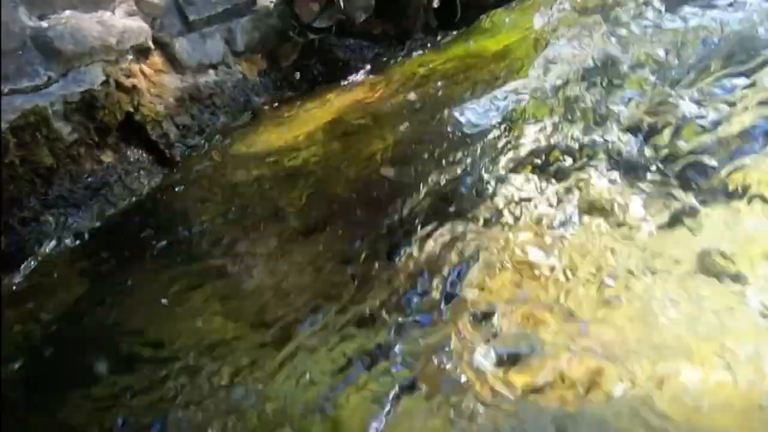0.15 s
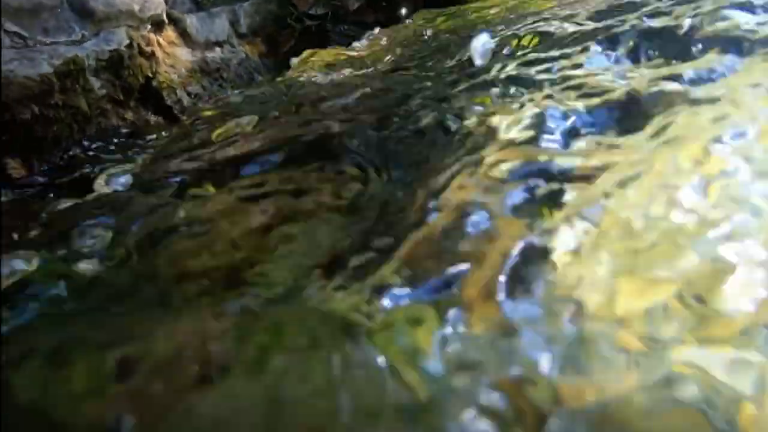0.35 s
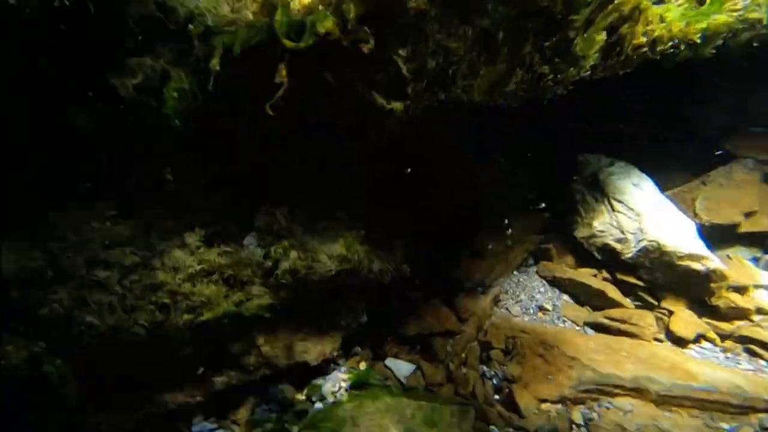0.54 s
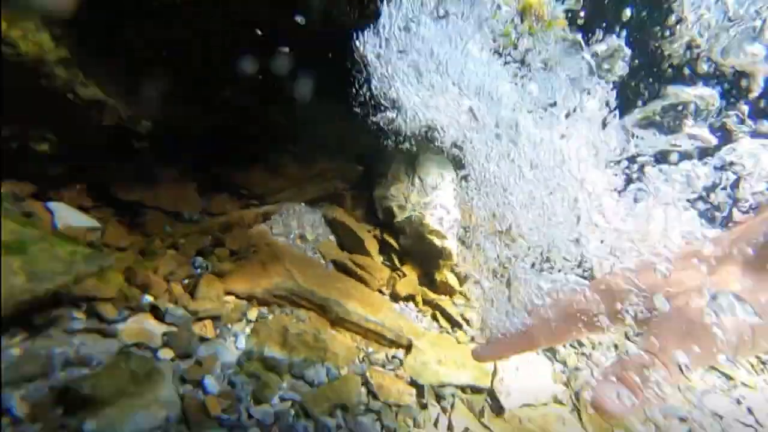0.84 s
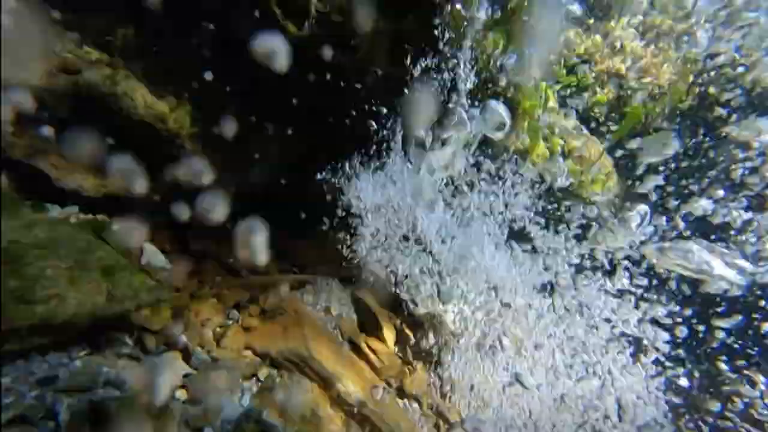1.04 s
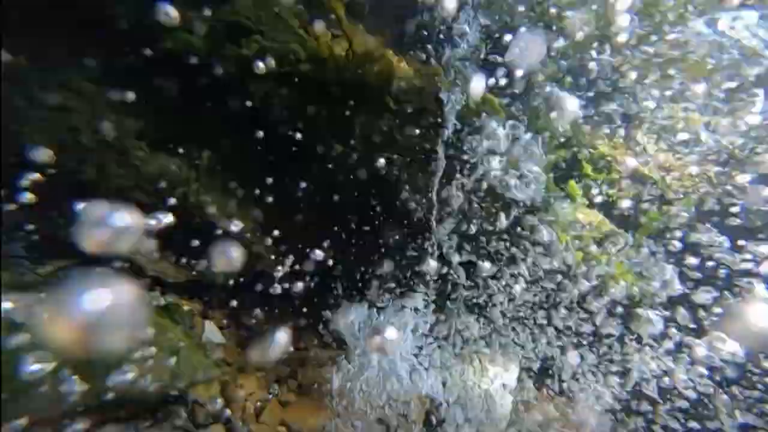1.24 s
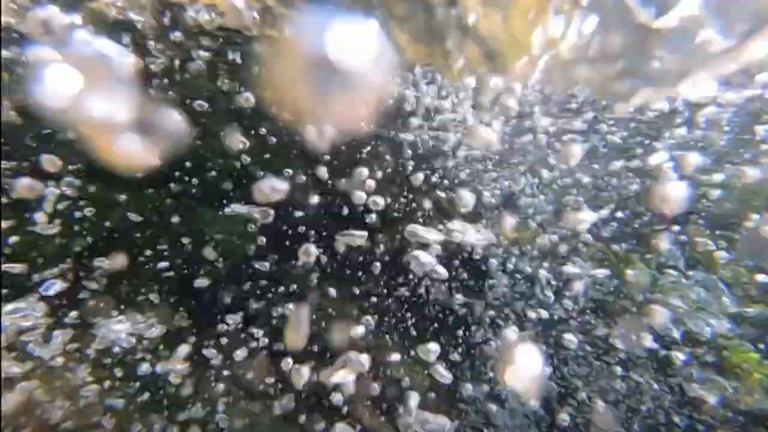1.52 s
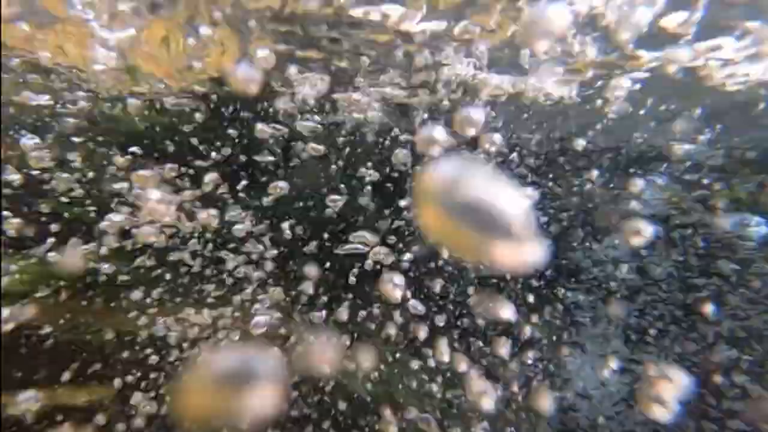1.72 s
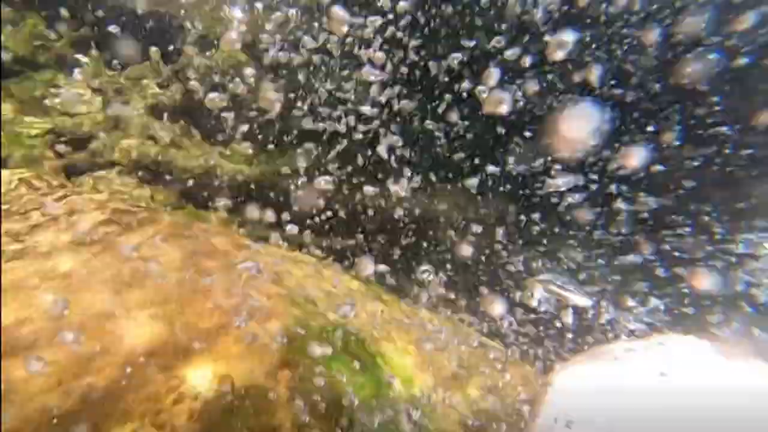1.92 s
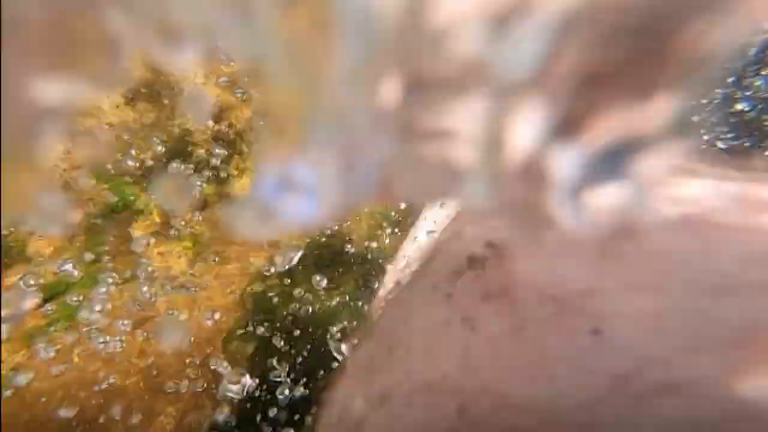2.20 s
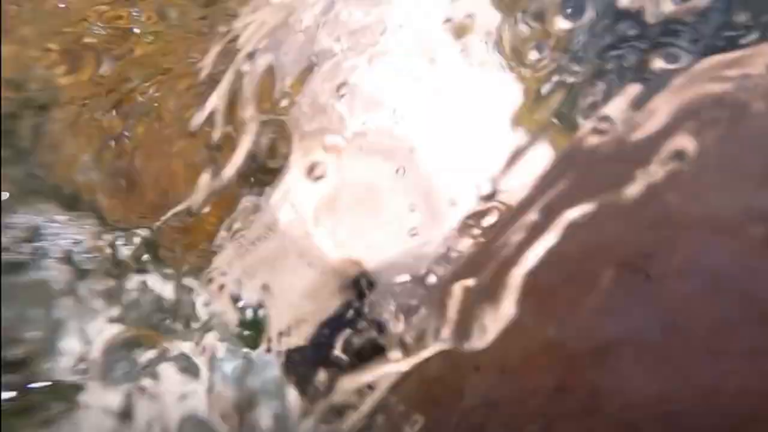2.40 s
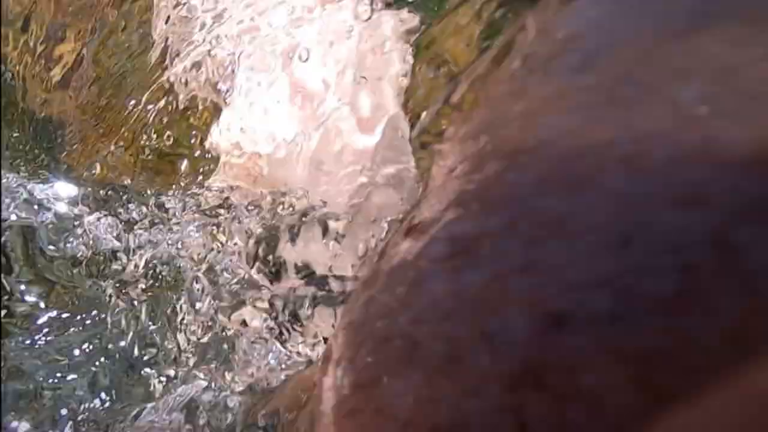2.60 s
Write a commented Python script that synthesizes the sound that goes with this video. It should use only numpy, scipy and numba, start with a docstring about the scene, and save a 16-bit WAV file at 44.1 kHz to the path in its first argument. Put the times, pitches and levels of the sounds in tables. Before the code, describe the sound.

Water splashing as the microphone plunges from a babbling spring into dull, bubbling, rumbling underwater churn

```python
"""A rocky spring, with a camera held over it and plunged under as a person drops in.
First, in air, the trickle babbles (many short rings) over low churning; drops snap and spray crackles.
Then water closes over the microphone: the trickle fades, the spray dulls, large bubbles ring as gliding
sines, pockets of air gurgle, surges push on the housing and a cloud of small bubbles murmurs. Through the
underwater part clumps of fine fizz sweep past and bubbles burst, coloured by the housing's resonances."""
import sys
import numpy as np
from scipy import signal
from scipy.fft import rfft, irfft
from scipy.io import wavfile
from numba import njit

SR = 44100
rng = np.random.default_rng(int(sys.argv[2]) if len(sys.argv) > 2 else 0)


def undo_db(level):
    """Turn decibels back into plain size, where 20 dB means ten times bigger."""
    steps = np.asarray(level, float) / 20
    return 10 ** steps


def unload_wav(signal):
    """Save mono or channel-first audio to the path in sys.argv[1] as 16-bit WAV at rate SR, clipped to [-1, 1]."""
    wavfile.write(
        sys.argv[1],
        SR,
        np.round(np.clip(np.atleast_2d(signal).T, -1, 1) * 32767).astype(np.int16),
    )


N = 121275  # samples
T = np.arange(N) / SR  # s
BIN_HZ = np.arange(N // 2 + 1) * SR / N
UNDER_S = .435  # the microphone goes under


def curve(rows):
    """Gain through (t/s, level/dB) rows, at -120 dB before them."""
    t, db = np.array(rows).T
    return undo_db(np.interp(T, t, db, left=-120))


def bursts(rows, rise_s):
    """Envelope of (peak t/s, level/dB, decay/s) bursts: quick exponential swell, exponential tail."""
    env = np.zeros(N)
    for peak_s, db, decay_s in rows:
        env += undo_db(db) * np.exp(np.minimum((T - peak_s) / rise_s, (peak_s - T) / decay_s))
    return env


def colour(x, points, lo_hz, hi_hz):
    """Flatten x, give it the (f/Hz, level/dB) spectrum, set band lo-hi to rms 1."""
    f = BIN_HZ + 1
    log_f = np.log(f)
    hz, db = np.array(points).T
    spec = rfft(x)
    # its own spectrum, smoothed along log frequency, is divided out
    grid = np.linspace(log_f[0], log_f[-1], num=40)
    own_power = [np.mean(np.abs(spec[np.abs(log_f - g) < .4]) ** 2) + 1e-12 for g in grid]
    own = np.exp(np.interp(log_f, grid, np.log(own_power)) / 2)
    spec = spec * undo_db(np.interp(log_f, np.log(hz), db, left=-140, right=-140)) / own
    band_rms = np.sqrt(2 * np.sum(np.abs(spec[(f > lo_hz) & (f < hi_hz)]) ** 2)) / N
    return irfft(spec / band_rms, N)


@njit
def ring(start, hz, size, cycles, glide, swell):
    """Each bubble swells and dies over its cycles while its pitch rises by glide per cycle."""
    y = np.zeros(N)
    for k in range(len(start)):
        tau = cycles[k] / hz[k] * SR * swell ** .5 / 2.45  # samples to the peak
        first = int(start[k] * SR)
        phase = 0.
        f = hz[k]
        for n in range(min(int(7 * tau), N - first)):
            envelope = (n / tau * np.exp(1 - n / tau)) ** swell
            y[first + n] += size[k] * envelope * np.sin(phase)
            phase += 2 * np.pi * f / SR
            f *= 1 + glide * hz[k] / SR
    return y


def swarm(count, lo_hz, hi_hz, cycles, spread_db, smooth):
    """Bubbles at random times, pitches and sizes, and a share of even noise to go with them."""
    when, pitch, rarity, length = rng.random((count, 4)).T
    hz = lo_hz * (hi_hz / lo_hz) ** pitch
    size = undo_db(spread_db * np.minimum(-np.log(rarity), 3.))
    grains = ring(when * N / SR, hz, size, cycles * (.5 + length), 0., 1.0)
    return grains, smooth * rng.standard_normal(N)


def layer(points, lo_hz, hi_hz, parts, blur_hz=30250.0):
    """Coloured grains and noise summed to rms 1; above blur_hz the grains merge into even wash."""
    grains, noise = parts
    share = np.std(noise)
    lone = 1 / (1 + (BIN_HZ / blur_hz) ** 4)  # how far grains stand apart at each frequency
    wash = rfft(colour(noise, points, lo_hz, hi_hz)) * np.sqrt(1 - lone ** 2 + share ** 2)
    mixed = rfft(colour(grains, points, lo_hz, hi_hz)) * lone + wash
    return irfft(mixed, N) / np.hypot(1, share)


def ring_each(rows):
    """Ring listed bubbles, pitch rising as they sound; small ones start more abruptly."""
    glide = 0.0012  # pitch rise per cycle, as a fraction
    small_hz = 420
    s, hz, db, cycles = np.array(rows, float).T
    start_hz = hz * (1 - glide * cycles / 2)
    out = np.zeros(N)
    # higher swell = rounder start; lead = cycles sounded before the listed time, as a share of all
    for pick, swell, lead in ((hz < small_hz, 2.2, 0.3944), (hz >= small_hz, 1.3, 0.2)):
        start = s - lead * cycles / hz
        out += ring(start[pick], start_hz[pick], undo_db(db[pick]), cycles[pick], glide, swell)
    return out


# Spectrum of the spring trickling, heard in air [f/Hz, relative level/dB per Hz]
TRICKLE_COLOUR = [(35, -74.5), (60, -10), (302, -0.5), (347, -0.5), (514, -0.5), (744, -2.5), (2530, -10),
                  (4800, -19), (5800, -25), (10000, -31.5), (15000, -45.5)]


def trickle():
    """Babbling water, a swarm of short rings that fades as the microphone goes under."""
    level_db, muffle_db_per_s = -30, 263.5
    grains = swarm(count=5000, lo_hz=148.9, hi_hz=13200, cycles=5.9, spread_db=3.5, smooth=0.44)
    x = layer(TRICKLE_COLOUR, 60, 12000, grains, blur_hz=5500)
    return x * undo_db(level_db - muffle_db_per_s * np.maximum(T - UNDER_S, 0))


# Turbulence on the housing, before a 0.5 dB lift [t/s, level/dB]
CHURN_LEVEL = [(0, -41.5), (.25, -35.5), (.33, -59), (.40, -36), (.44, -21.5), (.55, -16), (.6, -30.5),
               (.67, -18), (1.0, -37), (1.2, -26), (1.28, -20.5), (1.5, -26.5), (1.7, -19), (1.92, -27),
               (2.2, -19), (2.35, -16.5), (2.5, -38.5), (2.75, -41.5)]
# Its spectrum [f/Hz, relative level/dB per Hz]
CHURN_SPECTRUM = [(11, -20.5), (18, -5), (70, 1.5), (110, -1.5), (150, -12.5), (260, -35.5)]


def churn():
    """Turbulence rumbling against the housing: low, uneven pulses over noise."""
    grains = swarm(count=160, lo_hz=19.6, hi_hz=200, cycles=3.8, spread_db=5.5, smooth=0.58)
    return undo_db(0.5) * curve(CHURN_LEVEL) * layer(CHURN_SPECTRUM, 15, 170, grains)


# Single bubbles [t/s during the swell, f/Hz midway in the glide, peak level/dB, length/cycles]
BUBBLE_RINGS = [ (0.131, 1200, -28, 16), (0.2173, 784, -14, 3.4), (0.2174, 1610, -21.5, 6.8),
                (0.2395, 1617, -12.5, 9), (0.2397, 159.5, -12.5, 1.68), (0.2733, 1036, -25, 6.6),
                (0.3403, 1920, -15, 1.4), (0.3959, 975, -24.5, 5.1), (0.4222, 607, -16.5, 6.5),
                (0.428, 124.2, -15, 2.6), (0.4301, 1575, -11, 4.1), (0.4484, 1029, -1.5, 0.76),
                (0.4588, 863, -3, 1.34), (0.4679, 1053, -13.5, 8.4), (0.5046, 656, -10.5, 2.3),
                (0.5125, 1432, -35, 2), (0.5223, 1332, -11, 4.4), (0.5507, 529, -6, 1.94),
                (0.553, 207, -3, 6.3), (0.5841, 1078, -20.5, 9.0), (0.6342, 942, -14.5, 3.1),
                (0.6433, 200, -14.5, 7.5), (0.6679, 574, -14, 2.2), (0.6753, 293.4, -22, 11),
                (0.7084, 636.4, -16, 7.2), (0.7153, 159, -8, 3.5), (0.733, 601, -11, 8.4),
                (0.7508, 568, -11, 5.6), (0.7721, 1105, -17, 3.4), (0.778, 206, -17.0, 6.9),
                (0.8066, 1020, -21.5, 22), (0.832, 2300, -40.5, 26), (1.0134, 827, -24.5, 15.6),
                (1.0481, 800, -28, 10.8), (1.0774, 1256, -31, 17), (1.1027, 531, -25.5, 11),
                (1.1439, 171, -15, 3.1), (1.2801, 1460, -29.5, 5), (1.3072, 633, -23.5, 5.2),
                (1.3242, 189.2, -9, 5.34), (1.3635, 1610, -30.5, 4.1), (1.3729, 113.6, -24.5, 4.5),
                (1.3995, 583, -24, 8.7), (1.4584, 167, -8, 3.9), (1.453, 1480, -36, 7.7),
                (1.4637, 1370, -32.5, 12.4), (1.486, 1944, -46, 14.4), (1.7029, 780, -21, 1.5),
                (1.7956, 59.3, -14.5, 2.56), (1.9597, 608, -17, 3.4), (1.9812, 1345, -28.5, 9.2),
                (2.085, 1510, -46.5, 40), (2.192, 109.3, -13, 2.52), (2.2138, 1345, -17.5, 3.9),
                (2.2294, 318.4, -8, 1), (2.2296, 739, -11.5, 1.56), (2.2961, 102.6, -19.5, 6.1),
                (2.315, 1028, -31, 3.9), (2.368, 1000, -27.5, 3), (2.374, 550, -22, 6),
                (2.4728, 281, -13, 2.65), (2.4958, 746, -25, 3.7), (2.4961, 1285, -27, 5.2),
                (2.5657, 1623, -24, 1.95)]


def bubbles():
    """The bubbles a listener can point at, each a decaying sine of its own pitch."""
    return ring_each(BUBBLE_RINGS)


# Thrown spray and the plunge [t/s, level/dB]
SPRAY_LEVEL = [(.14, -67), (.17, -31), (.2, -42.5), (.236, -21.5), (.255, -32), (.265, -47.5), (.34, -37.5),
               (.378, -49), (.426, -23), (.44, -38.5), (.465, -32), (.485, -51), (.515, -31.5),
               (.526, -25.5), (.555, -35), (.582, -62), (.65, -77.5)]
# Drops that snap in air [t/s just ahead of the peak, level/dB before a 6.5 dB cut]
SNAP_DROPS = [(0.165, -11.5), (0.186, -18.5), (0.2131, -9), (0.2334, -7), (0.2452, -4), (0.2656, -20),
              (0.311, -20.5), (0.3436, -12.5), (0.3934, -19.5), (0.4271, -4)]
# Spray spectrum in air [f/Hz, relative level/dB per Hz]
AIR_COLOUR = [(180, -50.5), (300, -8), (620, -6.5), (1180, -10), (1620, -12), (2070, -5.5), (3510, -1.5),
              (5050, -15), (9140, -17.5), (15500, -62)]
# Spray spectrum through the wetted microphone [f/Hz, relative level/dB per Hz]
WET_COLOUR = [(180, -29.5), (300, -6.5), (870, -6.5), (1260, -5), (1590, -8.5), (3380, -20), (12000, -66),
              (15600, -92), (22000, -120)]


def spray():
    """Crackling, snapping drops from very short rings, bright in air and dull once wet."""
    snap_decay_s, wetting_s = 0.00082, 0.0059
    parts = swarm(count=12000, lo_hz=351, hi_hz=14800, cycles=1.3, spread_db=1.5, smooth=0.4)
    wet = np.clip((T - UNDER_S) / wetting_s, 0, 1)
    level = curve(SPRAY_LEVEL)
    snaps = bursts([(s + 0.00087, db, snap_decay_s) for s, db in SNAP_DROPS], rise_s=0.00036)
    in_air = level * (1 - wet) + undo_db(-6.5) * snaps
    bright = in_air * layer(AIR_COLOUR, 2200, 13000, parts)
    dull = wet * level * layer(WET_COLOUR, 2200, 11000, parts)
    return bright + dull


# Large pockets of air passing the microphone [t/s, level/dB]
GURGLE_LEVEL = [(.41, -27), (.44, -20), (.8, -37), (.95, -29), (1.15, -29.5), (1.23, -30), (1.3, -23),
                (1.42, -27.5), (1.52, -36), (2.1, -37), (2.3, -27.5), (2.55, -44), (2.75, -40.5)]
# Their spectrum [f/Hz, relative level/dB per Hz]
GURGLE_SPECTRUM = [(90, -24), (140, -5.5), (195, -7), (250, -7), (330, -20)]


def gurgle():
    """Large air pockets gurgling past: a sparse swarm of brief low rings over noise."""
    grains = swarm(count=160, lo_hz=111.2, hi_hz=284.3, cycles=2.0, spread_db=-1.5, smooth=0.43)
    return curve(GURGLE_LEVEL) * layer(GURGLE_SPECTRUM, 130, 227.4, grains)


# Further low rings, played just like the single bubbles, heard as slow surges on the housing [t/s during the
# swell, f/Hz midway in the glide, peak level/dB, length/cycles]
LOW_RINGS = [(0.441, 70, -22, 4.5), (.48, 76.6, -26, 2.38), (0.532, 107.5, -4.5, 1.4),
             (1.011, 174.7, -17, 3.58), (1.249, 86.3, -14.5, 3), (1.521, 67.9, -15.5, 2.2),
             (1.589, 73.4, -14.5, 0.94), (2.035, 80, -15.5, 2.26), (2.268, 108.3, -20, 1.2),
             (2.396, 195, -19.5, 4.3), (2.434, 38.8, -17, 2.2)]


def surges():
    """Further low rings, played just like the single bubbles: a few round low cycles each, heard as slow surges
    against the housing."""
    return ring_each(LOW_RINGS)


# Cloud of small bubbles [t/s, level/dB]
CLOUD_LEVEL = [(.42, -38), (.56, -19), (.61, -39), (.64, -24.5), (.78, -35.5), (.84, -35), (1.0, -37),
               (1.12, -29), (1.22, -34.5), (1.3, -31.5), (1.42, -40), (1.56, -46), (1.75, -34.5),
               (1.97, -30), (2.14, -32), (2.3, -43), (2.5, -37), (2.75, -46)]
# Its spectrum [f/Hz, relative level/dB per Hz]
CLOUD_SPECTRUM = [(200, -37), (280, -1.5), (413, 1), (465, -4.5), (581, -3), (1110, -14), (1350, -31.5),
                  (1700, -44.5), (2200, -75)]


def cloud():
    """Murmur of a cloud of small bubbles, their rings overlapping."""
    grains = swarm(count=1600, lo_hz=200, hi_hz=2604, cycles=6.2, spread_db=2.5, smooth=0.2)
    return curve(CLOUD_LEVEL) * layer(CLOUD_SPECTRUM, 300, 1200, grains)


# Resonances of the wet housing [f/Hz, width/Hz]
HOUSING_RINGS = [(1400, 140), (1800, 130), (2600, 170), (3400, 250)]


def housing(x):
    """Add the housing's resonant peaks to the direct sound of fizz and bursts."""
    peak = undo_db(6)  # of each resonance, over the direct sound
    lift = sum(peak / (1 + ((BIN_HZ - hz) / (width / 2)) ** 2) for hz, width in HOUSING_RINGS)
    return irfft(rfft(x) * (1 + lift), N)


SIZES_HZ = 700 * 1.85 ** np.arange(5)  # bands of bubble size
VARY_DB = 4.5  # scatter of the band levels


def size_band(x, hz):
    """The part of a sound made by bubbles of about one size: a bell on log frequency."""
    bell = np.exp(-((np.log(BIN_HZ + 1) - np.log(hz)) / .45) ** 2)
    return irfft(bell * rfft(x), N)


# Fine fizz swept past the microphone, before a 21 dB cut and the housing [t/s, level/dB]
FIZZ_LEVEL = [(.56, -30), (.64, -30.5), (.78, -25.5), (.83, -41.5), (.96, -44.5), (1.0, -64.5),
              (1.13, -46.5), (1.23, -58.5), (1.26, -42.5), (1.38, -38), (1.43, -55), (1.56, -68),
              (1.6, -45), (1.66, -56), (1.76, -77), (2.14, -78.5), (2.18, -34.5), (2.24, -36.5),
              (2.3, -51.5), (2.33, -40), (2.47, -38.5), (2.52, -53), (2.75, -54.5)]
# Its spectrum before the housing [f/Hz, relative level/dB per Hz]
FIZZ_SPECTRUM = [(600, -7), (1100, 4.5), (2000, -5.5), (3600, -20.5), (4600, -30), (10000, -51)]


def fizz():
    """Fine fizz in clumps: the level of each bubble size wanders on its own."""
    clump_s = .012
    grains = swarm(count=6000, lo_hz=800, hi_hz=5000, cycles=11, spread_db=5, smooth=.2)
    x = undo_db(-21.0) * curve(FIZZ_LEVEL) * layer(FIZZ_SPECTRUM, 1800, 5000, grains, blur_hz=4200)
    knots = np.arange(0, N / SR + 1, clump_s)
    out = np.zeros(N)
    for hz in SIZES_HZ:
        clump = undo_db(VARY_DB * np.interp(T, knots, rng.standard_normal(len(knots))))
        out += size_band(clump * x, hz)
    return housing(out)


# Bursts on the housing [t/s just ahead of the peak, level/dB before scatter, a 19 dB cut and the housing]
BURST_TICKS = [(0.746, -27), (0.806, -39), (0.8821, -28), (0.943, -40), (1.08, -39), (1.1373, -42),
               (1.2719, -31), (1.3043, -38), (1.344, -27.5), (1.426, -42), (1.5884, -32), (1.6481, -38),
               (1.699, -36), (1.726, -29.5), (1.981, -42.5), (1.996, -47.5), (2.1692, -38), (2.1935, -18.5),
               (2.237, -28), (2.257, -38.5), (2.2748, -34), (2.3353, -29), (2.355, -35.5), (2.4015, -30),
               (2.4534, -31.5), (2.4963, -28.5), (2.5405, -36.5), (2.5615, -34.5), (2.602, -43.5)]
# Their spectrum before the housing [f/Hz, relative level/dB per Hz]
BURST_COLOUR = [(600, 5), (1100, -4.5), (4000, -25.5), (10000, -48)]


def ticks():
    """Clusters of bubbles bursting on the housing; each burst favours other bubble sizes."""
    decay_s = 0.0041
    grains = swarm(count=8000, lo_hz=600, hi_hz=9000, cycles=6, spread_db=3., smooth=.9)
    x = undo_db(-19) * layer(BURST_COLOUR, 1800, 5000, grains)
    out = np.zeros(N)
    for hz in SIZES_HZ:
        chance = VARY_DB * rng.standard_normal(len(BURST_TICKS))
        rows = [(s + 0.00091, db + c, decay_s) for (s, db), c in zip(BURST_TICKS, chance)]
        out += size_band(bursts(rows, rise_s=.0012) * x, hz)
    return housing(out)


def scene():
    """All sources summed at one microphone."""
    mono = (trickle() + churn() + bubbles() + spray() + gurgle()
            + surges() + cloud() + fizz() + ticks())
    return mono[None, :]


def top_cut(x):
    """Nothing passes above the cut-off."""
    return signal.sosfilt(signal.butter(12, 15720, fs=SR, output="sos"), x)


def record(dry):
    """The camera rounds the loudest peaks and cuts the top."""
    top_hz = 15700
    soft = np.tanh(dry ** 3 * 0.99 + dry) * 0.99
    low_pass = signal.ellip(8, .2, 70, top_hz, fs=SR, output="sos")
    mix = signal.sosfilt(low_pass, soft)
    return top_cut(mix)


dry = scene()
out = record(dry)
unload_wav(out)
```